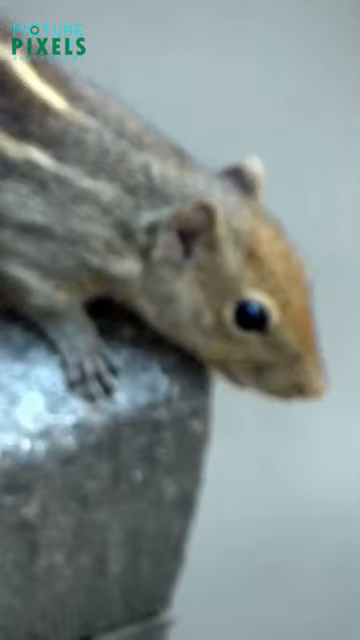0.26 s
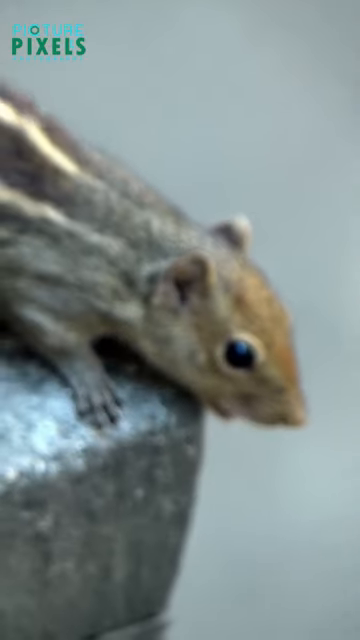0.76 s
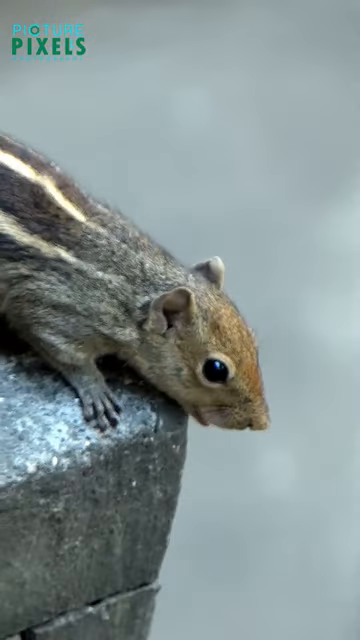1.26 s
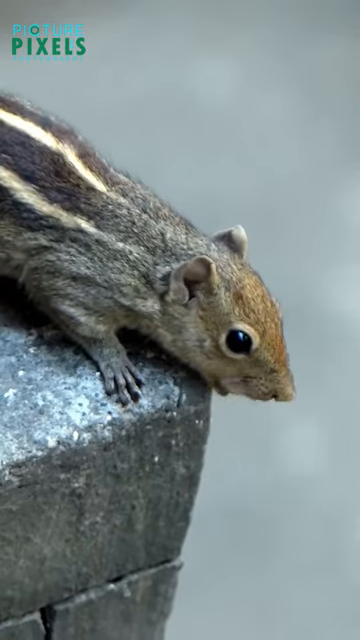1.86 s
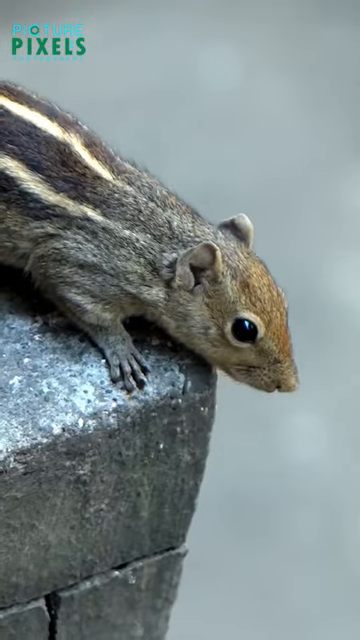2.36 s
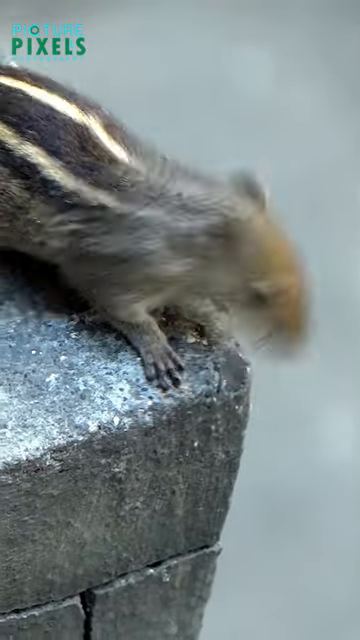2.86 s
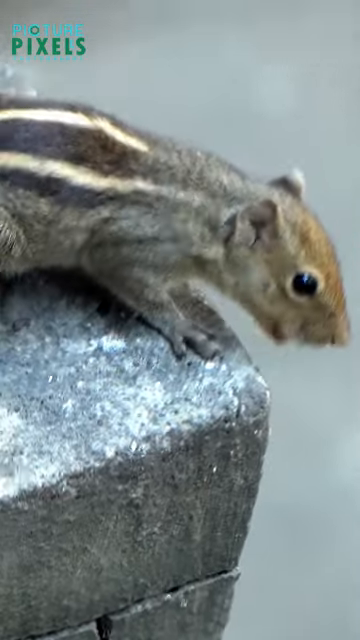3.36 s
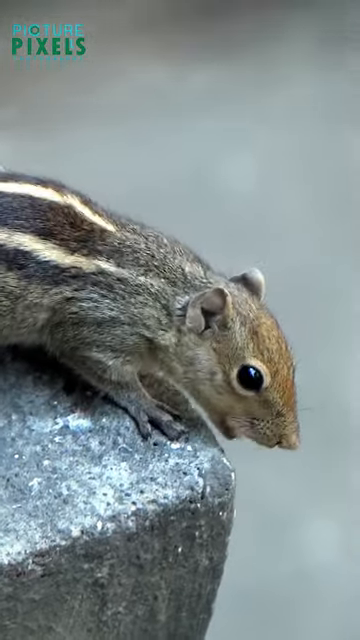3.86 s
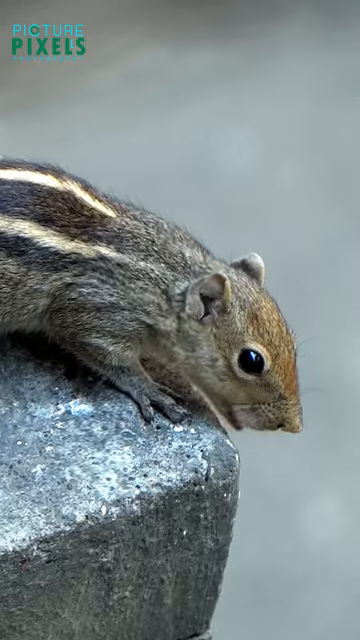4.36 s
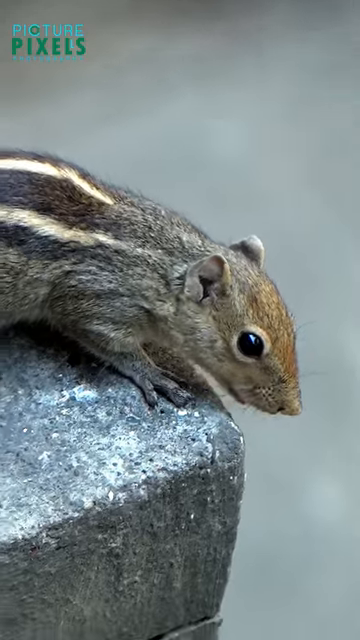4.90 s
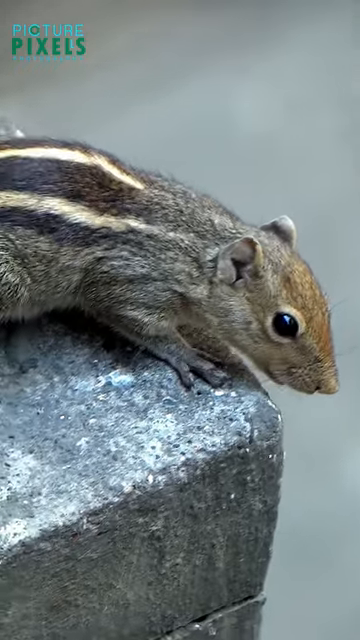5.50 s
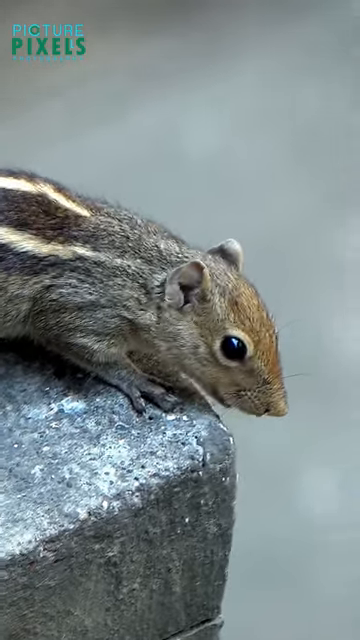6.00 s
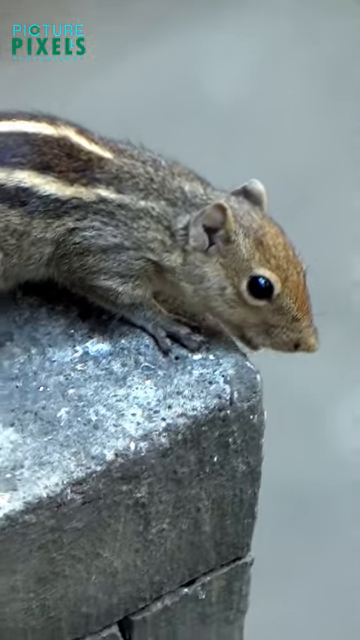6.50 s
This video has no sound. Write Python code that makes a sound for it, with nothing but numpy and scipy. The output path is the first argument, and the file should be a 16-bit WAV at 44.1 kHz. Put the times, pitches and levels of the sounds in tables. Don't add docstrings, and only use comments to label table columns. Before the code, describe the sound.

A small striped squirrel whistles sharp, high chirps in pairs from a stone ledge, ringing off nearby walls over low traffic rumble and distant horns.

```python
import sys
import numpy as np
from scipy import signal
from scipy.io import wavfile
from scipy.ndimage import uniform_filter1d, minimum_filter1d

SR = 44100
rng = np.random.default_rng(int(sys.argv[2]) if len(sys.argv) > 2 else 0)


def volts_from_decibels(level):
    exponent = np.asarray(level, float) / 20
    return 10 ** exponent


def persist_wave(psi):
    counts = np.round(np.clip(psi, -1, 1) * 32767).astype(np.int16)
    wavfile.write(sys.argv[1], SR, np.atleast_2d(counts).T)


N = 297234
EARLY = 4410

# (frequency [Hz], level [dB per Hz])
STREET_SPECTRUM = [(15, -52), (25, -16), (152, -4.5), (223, -3.5), (280, -10), (528, -4), (631, -8.5),
                   (878, -9), (1290, -10), (3290, -18.5), (3840, -17), (5910, -16.5), (7820, -15.5),
                   (10900, -18), (14100, -53), (22000, -120)]
# (time [s], level [dB])
STREET_SWELL = [(0.0, -37.5), (0.81, -39), (1.292, -37.5), (1.54, -38.5), (1.762, -39), (1.99, -37),
                (3.06, -37.5), (3.59, -36), (4.35, -38), (6.74, -39.5)]
# (frequency [Hz], likeness [0-1])
LIKENESS = [(30, .35), (70, .4), (150, .8), (500, .9), (3000, .86), (10000, .75)]
# (time [s], length [s], start
# pitch [Hz], end pitch [Hz], level [dB])
FAR_TONES = [(-.09, .68, 224, 222, -39), (-.085, 3.05, 525, 529.5, -51.5), (0.462, .25, 2030, 2020, -27),
             (.49, 0.11, 2840, 2825, -25), (.7, 0.82, 223, 222.3, -42.5), (1.1, 0.49, 1253, 1254, -49.5),
             (1.46, .42, 1260, 1201, -33), (1.78, 0.77, 221, 220, -43.5), (1.84, 0.37, 2008, 1943, -39),
             (2.58, 0.41, 4670, 4770, -31), (2.85, .33, 4825, 4666, -29.5), (3.3, 3.4, 375, 375, -51),
             (3.38, 0.43, 1102, 1120, -40.5), (3.42, 0.516, 1479, 1497, -36.5),
             (3.86, 0.44, 1136, 1112, -31.5), (3.9, 0.38, 1495, 1500, -46), (4.22, 0.95, 1120, 1099, -41.5),
             (4.249, .17, 2000, 2360, -34), (6.22, 0.47, 1454, 1441, -46.5)]
# (time of top [s], top pitch [Hz], level [dB], width of fall [s], voiced after top [s])
SLURRED = [
    (-.025, 3446, -6, .035, 0.061),
    (.568, 3525, -8, 0.031, 0.057),
    (4.254, 3521, -5, .041, .078),
]
CAUGHT = [
    (1.15, 3467, -8, 0.037, 0.094),
    (1.89, 3476, -9, 0.044, 0.063),
    (3.682, 3590, -4.5, 0.038, .088),
    (5.197, 3520, -9.5, 0.033, 0.045),
    (5.83, 3527, -9, 0.029, 0.03),
    (6.3, 3578, -6.5, .034, 0.082),
]
# (place on bell [bell widths], level [dB], second harmonic [dB re first])
ARCH_EFFORT = [(-0.9566, -26.5, -4), (-0.13, -3, -4), (0, -2.5, -4.5), (0.07, -1.5, -5), (0.65, -3, -11),
               (1.18, -9.5, -11.5), (3, -14, -8)]
# (time [s], length [s], low pitch [Hz], top pitch [Hz], level [dB])
RISES = [
    (0.12, 0.057, 2400, 3075, -13),
    (0.725, 0.068, 2387, 3087, -15.5),
    (1.393, 0.062, 2330, 2998, -14.5),
    (2.067, 0.065, 2300, 3056, -16.5),
    (3.865, 0.065, 2427, 3124, -14.5),
    (4.417, 0.067, 2310, 2972, -13.5),
    (5.308, 0.056, 2370, 3017, -18),
    (6.48, 0.06, 2419, 3042, -15),
]
# (time from start [s], share of climb [1], level [dB], second harmonic [dB re first])
RISE_EFFORT = [(0, -.05, -16, -44), (0.009, -0.027, -4.5, -34), (.019, 0.098, -2.5, -21),
               (.028, .62, 1.5, -12.5), (0.038, .93, -0.1, -6), (.09, 1.05, -2, -8)]
# (time [s], pitch [Hz], level [dB], second harmonic [dB re first])
CRACKED = [
    [(2.575, 3692, -17.5, -38), (2.59, 3390, -34, 18), (2.605, 3435, -4, -11), (2.62, 2976, -28, -3.5),
     (2.635, 3040, -52, -12)],
    [(3.012, 2947, -37.5, 1.5), (3.02, 3015, -7, 1.5), (3.035, 3020, -71, 10.5)],
    [(3.305, 3648, -29.5, -10), (3.32, 3550, -22, 2), (3.345, 3355, -7, 2.5), (3.37, 3300, -32.5, 4.5),
     (3.41, 3466, -20.5, -3.5), (3.44, 3373, -22.5, -14), (3.475, 3457, -23.5, 2.5)],
    [(4.72, 2188, -38, -7.5), (4.738, 2680, -18, -12), (4.752, 3003, -18.5, -1.5), (4.77, 3234, -18.5, -3),
     (4.797, 3299, -17.5, -5), (4.805, 3290, -23, -4)],
]
CRACKED_THROWN_DB = [0.7, -4, 2.7, 1.2]
# (time [s], length [s], start pitch [Hz], end pitch [Hz], level [dB])
SQUEAKS = [(1.133, 0.026, 3290, 3473, -13.5), (1.876, 0.004, 3243, 3260, -7.5),
           (2.536, 0.043, 3575, 3470, -24), (2.537, 0.052, 5343, 5330, -20.5),
           (2.565, 0.23, 7270, 7130, -35.5), (2.999, 0.012, 2040, 1895, -18), (3, .007, 5630, 5530, -24.5),
           (3.012, 0.0092, 10180, 9900, -29.5), (3.104, 0.0047, 3120, 2830, -42),
           (3.286, 0.05, 3563, 3580, -20.5), (3.305, 0.022, 1428, 1430, -23),
           (3.306, 0.05, 7550, 7530, -23.5), (3.312, 0.021, 5400, 5480, -20.5),
           (3.326, 0.037, 3030, 2875, -18), (3.41, 0.078, 5490, 6590, -27.5),
           (3.426, .019, 1960, 1910, -30), (3.667, .021, 3444, 3650, -20.5),
           (3.983, 0.0047, 3040, 2900, -19.5), (5.173, .016, 3280, 3470, -15),
           (5.785, .024, 5230, 5075, -31), (5.788, 0.026, 3610, 4040, -25.5), (5.9, 0.035, 4900, 5890, -32),
           (5.911, 0.032, 1874, 1910, -40.5), (6.256, 0.023, 3782, 3770, -26.5)]
# (delay [s], left level [dB], right level [dB])
ECHOES = [
    (.0035, -7, -3),
    (.0075, 0.5, -10),
    (0.0123, -10, -1),
    (0.019, -14, -15.5),
    (0.028, -42, -23),
]
# (time [s], length [s], level [dB])
HORN = [
    (0.175, 0.18, -19),
    (0.386, 0.094, -14),
]
# (multiple of fundamental [1], level [dB])
HORN_PARTIALS = [(5, 4.4), (6, -14), (7, 4.5), (8, -7), (11, -55), (12, -29.5), (14, -34.5), (15, -21.5),
                 (16, -26.5), (17, -20.5), (18, -18.5), (19, -23.5), (20, -30), (21, -39), (22, -25),
                 (24, -38), (25, -23.5), (26, -27), (10, -38.5)]


def rms_one(x):
    return x / np.sqrt(np.mean(x ** 2) + 1e-20)


def band(x, order, edges_hz, kind="band"):
    return signal.sosfilt(signal.butter(order, edges_hz, kind, fs=SR, output="sos"), x)


def drift(hz, size):
    r = np.exp(-2 * np.pi * hz / SR)
    settle = 9000
    return rms_one(signal.lfilter([1], [1, -2 * r, r * r], rng.standard_normal(size + settle))[settle:])


def span(rows):
    s, *columns = np.transpose(rows)
    at = np.arange(round(s[0] * SR), round(s[-1] * SR))
    return at + EARLY, [np.interp(at / SR, s, c) for c in columns]


def phase(hz):
    return 2 * np.pi * np.cumsum(hz) / SR


def add(track, at, sound):
    edge = np.minimum(np.arange(len(at)), np.arange(len(at))[::-1]) / 90
    track[at] += np.sqrt(2) * sound * np.minimum(edge, 1)


def street():
    out = 0
    edges = np.geomspace(22, 11500, 19)
    white = rng.standard_normal((2, 2, N + EARLY))
    for k, (low, high) in enumerate(zip(edges, edges[1:])):
        mid, side = band(white[k % 2], 2, [low, high])
        place = np.log(low * high) / 2
        hz, db = np.transpose(STREET_SPECTRUM)
        level_db = np.interp(place, np.log(hz), db)
        hz, likeness = np.transpose(LIKENESS)
        alike = np.clip(np.interp(place, np.log(hz), likeness), 0, 1)
        gain = volts_from_decibels(level_db + 2.8 * drift(12, N + EARLY))
        out = out + gain * (np.sqrt(1 + alike) * mid + np.sqrt(1 - alike) * side * [[1], [-1]])
    s, swell_db = np.transpose(STREET_SWELL)
    swell_db = np.interp((np.arange(N + EARLY) - EARLY) / SR, s, swell_db - np.mean(swell_db))
    return volts_from_decibels(-37.5 + swell_db) * rms_one(out)


def far_tones():
    fade_s = 0.089
    out = np.zeros(N + EARLY)
    for s, length, start_hz, end_hz, level_db in FAR_TONES:
        at, (hz,) = span([(s, start_hz), (s + length, end_hz)])
        swell = np.clip(np.minimum(at - at[0], at[-1] - at) / (fade_s * SR), 0, 1)
        width_hz = 4 + 0.015 * start_hz
        smear = 0.62 + 0.42 * (drift(width_hz, len(at)) + 1j * drift(width_hz, len(at)))
        add(out, at, volts_from_decibels(level_db) * swell * np.imag(smear * np.exp(1j * phase(hz))))
    return out


def arch(top_s, top_hz, level_db, fall_s, after_s, choked_db):
    lead_s, catch_s = 0.048, 0.013
    start_hz, rest_hz, rise_s, bluntness = 2300, 2752, 0.05, 1.7
    t = np.linspace(-lead_s, after_s, num=40)
    place = t / np.where(t < 0, rise_s, fall_s)
    low_hz = np.where(t < 0, start_hz, rest_hz)
    places, effort_db, second_db = np.transpose(ARCH_EFFORT)
    hz = low_hz + (top_hz - low_hz) * np.exp(-abs(place) ** bluntness)
    level_db = level_db + np.interp(place, places, effort_db) + choked_db * (t < -catch_s)
    return np.transpose([top_s + t, hz, level_db, np.interp(place, places, second_db)])


def calls():
    every = [(arch(*row, 0), 0.09, 1.7) for row in SLURRED]
    every += [(arch(*row, -16), 0.09, 1.7) for row in CAUGHT]
    every += [(rise(*row), 0.2, -3) for row in RISES]
    every += [(rows, 0.27, db) for rows, db in zip(CRACKED, CRACKED_THROWN_DB)]
    return sorted(every, key=lambda call: call[0][0][0])


def whistles():
    out = np.zeros(N + EARLY)
    for rows, rough, _ in calls():
        at, (hz, level_db, second_db) = span(rows)
        hz = uniform_filter1d(hz, size=300) * (1 + 0.03 * rough * drift(292, len(at)))
        turn = phase(hz)
        breathy = 0.4 + 0.4 * drift(477, len(at))
        third_db = -12 - 21.5 * (3500 - hz) / 1000
        third = volts_from_decibels(third_db) * breathy * np.sin(3 * turn)
        tone = np.sin(turn) + volts_from_decibels(second_db) * np.sin(2 * turn + 1) + third
        flutter = 1 + rough * drift(223, len(at))
        add(out, at, volts_from_decibels(level_db + 0.5) * flutter * tone)
    return out


def breath(voice):
    high = band(voice, 4, 3150, "high")
    hiss = band(rng.standard_normal(len(voice)), 3, [9800, 11000])
    return volts_from_decibels(-23) * uniform_filter1d(abs(high), size=200) * rms_one(hiss)


def yard(x):
    tail_db, tail_t60_s, side_db = -4.5, 0.57, -13.5
    slap_s, slap_db, slap_t60_s = 0.092, -15.5, 0.27
    t = np.arange(SR) / SR
    tail = volts_from_decibels(tail_db) * rms_one(volts_from_decibels(-60 * t / tail_t60_s)) * np.minimum(t / 0.0019, 1)
    slap = volts_from_decibels(slap_db) * rms_one(volts_from_decibels(-60 * (t - slap_s) / slap_t60_s) * (t > slap_s))
    mid, side = rng.standard_normal((2, SR))
    diffuse = (tail + slap) / np.sqrt(SR) * (mid + volts_from_decibels(side_db) * side * [[1], [-1]])
    facing = [(np.mean(rows, axis=0)[0], db) for rows, _, db in calls()]
    thrown = x * volts_from_decibels(np.interp((np.arange(N + EARLY) - EARLY) / SR, *np.transpose(facing)))
    thrown = band(thrown, 2, 2570, "high")
    out = x + signal.fftconvolve(thrown[None], diffuse, axes=1)[:, :N + EARLY]
    for delay, left_db, right_db in ECHOES:
        out -= volts_from_decibels([[left_db], [right_db]]) * np.roll(x, round(delay * SR))
    return out


def rise(start_s, length_s, low_hz, top_hz, level_db):
    release_s, release_db = 0.016, -14.5
    t = np.linspace(0, length_s, num=30)
    s, *columns = np.transpose(RISE_EFFORT)
    climb, effort_db, second_db = (np.interp(t, s, c) for c in columns)
    hz = low_hz + (top_hz - low_hz) * climb
    fade_db = release_db * np.clip(1 - (length_s - t) / release_s, 0, 1)
    return np.transpose([start_s + t, hz, level_db + effort_db + fade_db, second_db])


def horn():
    fundamental_hz, attack_s, release_s, sag_db_per_s = 403.6, 0.02, 0.023, -38
    points = []
    for s, length, db in HORN:
        end_db = db + sag_db_per_s * length
        points += [(s, -50), (s + attack_s, db), (s + length - release_s, end_db), (s + length, -45)]
    at, (level_db,) = span(points)
    out = np.zeros(N + EARLY)
    for multiple, part_db in HORN_PARTIALS:
        shimmer_db = (1.2 + 0.14 * multiple) * drift(15 + 3 * multiple, len(at))
        turn = 2 * np.pi * (round(multiple) * fundamental_hz * at / SR + rng.random())
        add(out, at, volts_from_decibels(level_db + part_db - 1.0 + shimmer_db) * np.sin(turn))
    return out


def squeaks():
    out = np.zeros(N + EARLY)
    for s, length, start_hz, end_hz, level_db in SQUEAKS:
        at, (hz,) = span([(s, start_hz), (s + length, end_hz)])
        hz = hz * (1 + 0.0089 * drift(220, len(at)))
        add(out, at, volts_from_decibels(level_db) * np.hanning(len(at)) ** 0.78 * np.sin(phase(hz)))
    return out


def scene():
    voice = whistles() + squeaks()
    near = yard(voice + breath(voice) + horn()) * volts_from_decibels([[0.4], [-0.4]])
    return (near + far_tones() + street())[:, EARLY:]


def add_thumps(x):
    return x + volts_from_decibels(-30.5) * band(x ** 2, 1, [40, 130])


def band_gate(x):
    threshold_db, grain_db, grain_side_db = -46.5, -17, -4
    shape = dict(window="cosine", nperseg=2048, noverlap=1024)
    bins = signal.stft(x, **shape)[2]
    width, used = 6, 1020
    bands = bins[:, :used].reshape(2, -1, width, bins.shape[-1])
    level = np.sqrt(np.mean(abs(bands) ** 2, axis=(0, 2), keepdims=True))
    hz = (np.arange(level.shape[1]) * width * SR / 2048)[:, None, None]
    spared = volts_from_decibels(-16 * np.clip(1 - hz / 2300, 0, 1) - 4 * (hz > 9600))
    chance = volts_from_decibels(1.5 * rng.standard_normal(level.shape))
    loudest = level[:, 16:].max(axis=1, keepdims=True) ** 0.5
    kept = level > volts_from_decibels(threshold_db) * spared * chance * loudest
    noise = rng.standard_normal(bands.shape) + 1j * rng.standard_normal(bands.shape)
    grain = noise[:1] + volts_from_decibels(grain_side_db) * noise
    bins[:, :used] = (kept * (bands + volts_from_decibels(grain_db) * level * grain)).reshape(2, used, -1)
    return signal.istft(bins, **shape)[1][:, :N]


def limiter(x):
    gain = minimum_filter1d(np.minimum(1, 1.15 / (abs(x).max(axis=0) + 1e-9)), size=120)
    return np.clip(x * uniform_filter1d(gain, size=120), -1, 1)


def top_cut(x):
    return signal.sosfilt(signal.butter(12, 11030, fs=SR, output="sos"), x)


def record(dry):
    heard = band_gate(add_thumps(dry))
    steep = signal.ellip(12, 0.3, 80, 11020, fs=SR, output="sos")
    return top_cut(limiter(signal.sosfilt(steep, heard)))


dry = scene()
out = record(dry)
persist_wave(out)
```